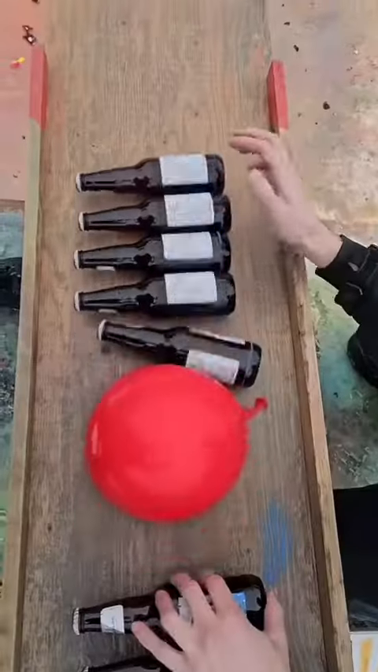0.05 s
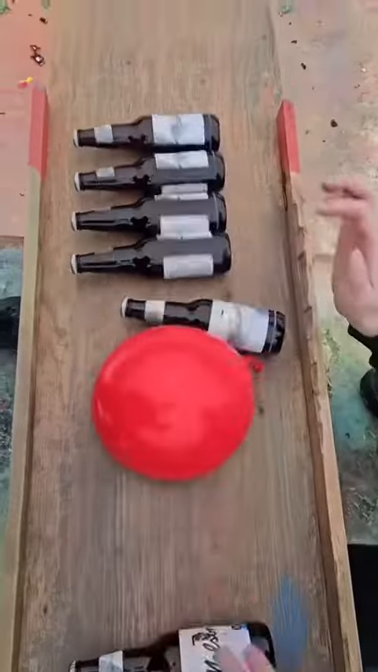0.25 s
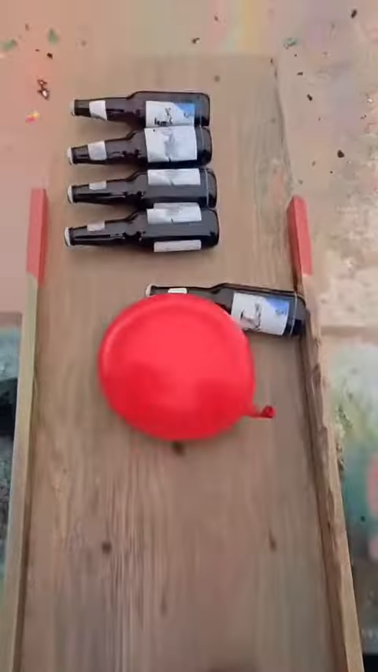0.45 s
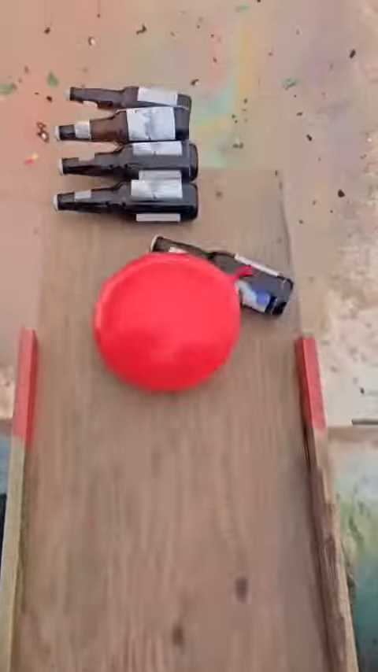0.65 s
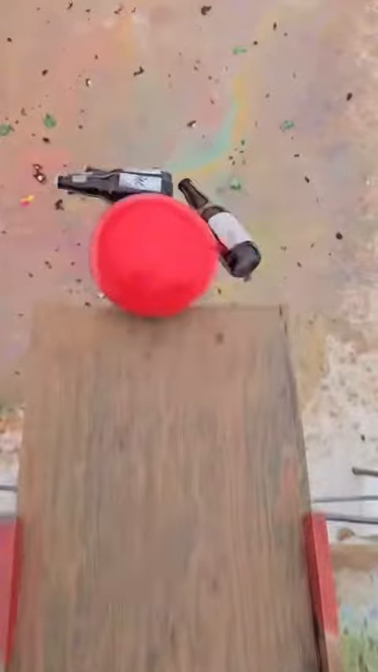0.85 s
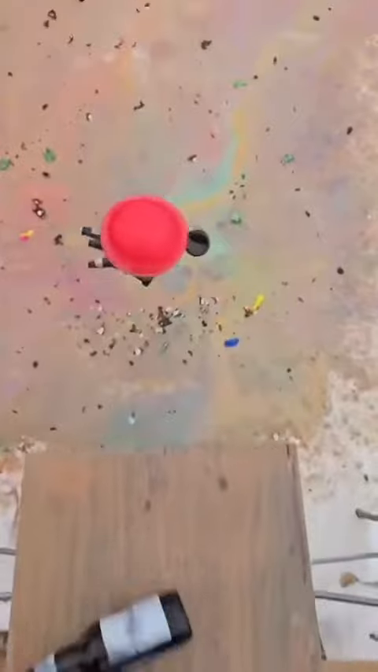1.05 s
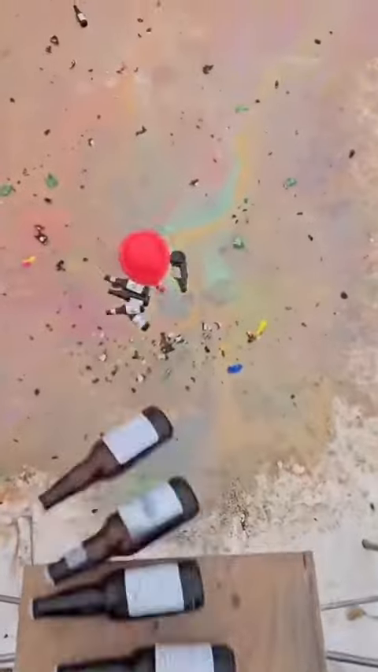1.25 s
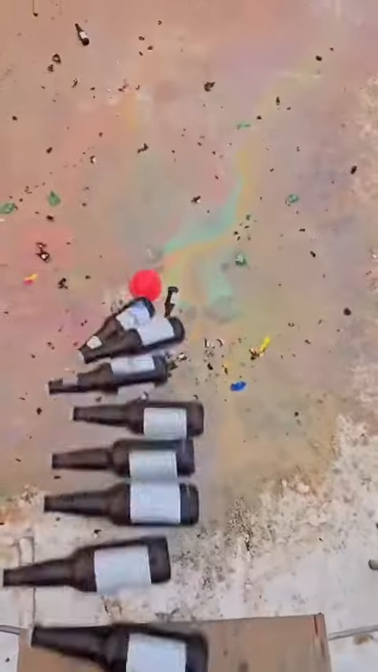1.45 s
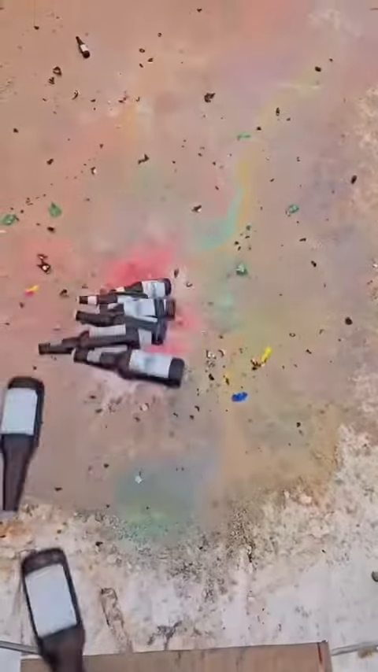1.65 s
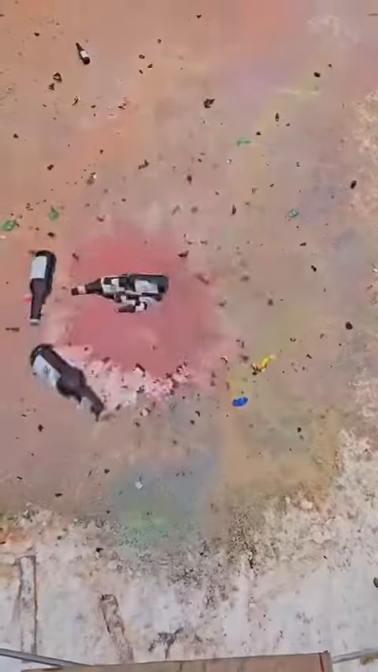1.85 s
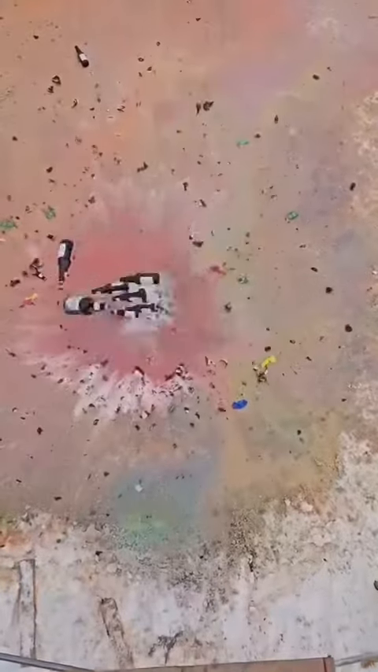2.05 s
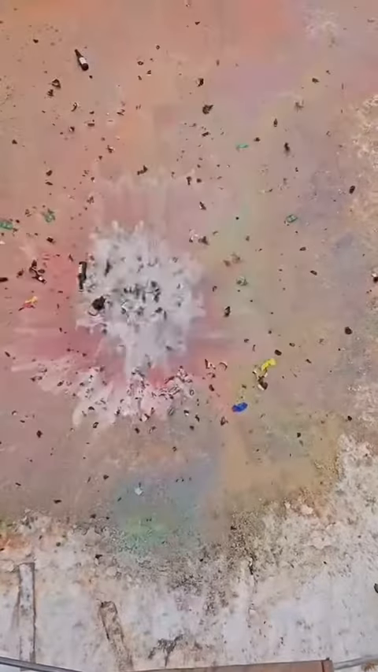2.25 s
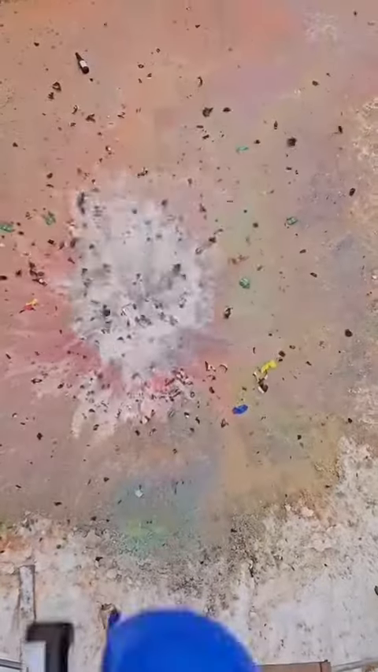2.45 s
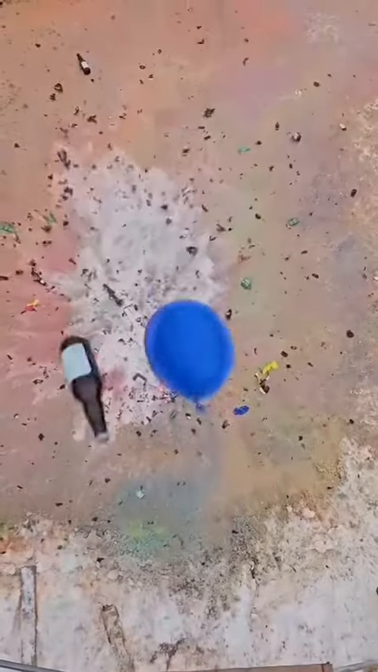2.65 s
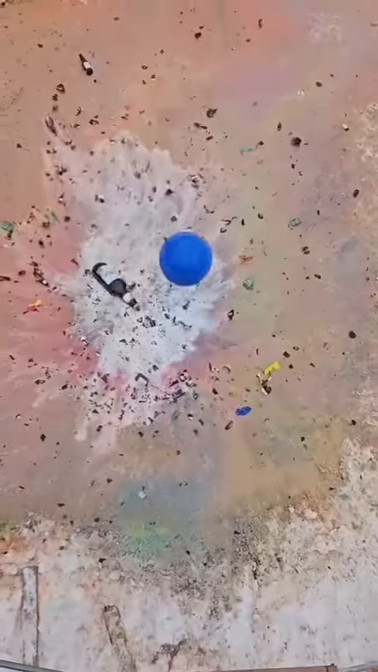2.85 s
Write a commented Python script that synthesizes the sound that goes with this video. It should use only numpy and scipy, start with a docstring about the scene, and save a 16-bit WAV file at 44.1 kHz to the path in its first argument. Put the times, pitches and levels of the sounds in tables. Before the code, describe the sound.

Bottles rolling and knocking on a plywood ramp, followed by rapid popping glass crashes and scattering shards

```python
"""Full glass bottles rumble down a plywood chute beside the microphones: noisy bumps and knocks excite board modes.
On the way glass rattles and bottle clinks bottle: rough contacts ring damped modes of the glass.
Later they burst one after another on hard ground below: each crack is gritty noise with ringing fragments,
each pop and thud a struck, heavily damped resonance, and shards and liquid spray as coloured noise and clicks.
Throughout there is faint open air, shaped noise, and only a short scatter from nearby surfaces."""
import sys
import numpy as np
from scipy import signal
from scipy.fft import rfft, irfft, next_fast_len
from scipy.io import wavfile

SR = 44100
rng = np.random.default_rng(int(sys.argv[2]) if len(sys.argv) > 2 else 0)


def gain_from_db(level_db):
    """Convert decibel levels to linear amplitude factors (20 dB per decade)."""
    decades = np.asarray(level_db, float) / 20
    return 10 ** decades


def persist_wave(psi):
    """Save psi, clipped to +-1, as 16-bit WAV."""
    counts = np.round(np.clip(psi, -1, 1) * 32767).astype(np.int16)
    wavfile.write(sys.argv[1], SR, np.atleast_2d(counts).T)


N = 130095  # samples in the scene
TAIL_N = int(0.4 * SR)  # samples in a decaying tail


def level(x, db=0):
    """Power normalisation: scales x to an rms level in dB."""
    return x * gain_from_db(db) / np.sqrt(np.mean(x ** 2))


def curve(table, column):
    """Amplitude envelope: gain over time from a level column, near silence (-120 dB) before the first row."""
    rows = np.array(table)
    return gain_from_db(np.interp(np.arange(N) / SR, rows[:, 0], rows[:, column], left=-120))


def colour(x, table):
    """Spectral weighting: filters x by (f/Hz, level/dB) points joined on a logarithmic frequency axis."""
    rows = np.array(table)
    size = next_fast_len(len(x) + 4096)
    hz = np.maximum(np.arange(size // 2 + 1) * SR / size, 1)
    gain = gain_from_db(np.interp(np.log(hz), np.log(rows[:, 0]), rows[:, 1]))
    return irfft(rfft(x, size) * gain, size)[:len(x)]


def ring(x, hz, t60):
    """Damped harmonic oscillator: one mode driven by x; a unit click rings with a peak of about 1."""
    r = np.exp(-np.log(1000) / (t60 * SR))
    w = 2 * np.pi * min(hz, 0.45 * SR) / SR
    return signal.lfilter([0, r * np.sin(w)], [1, -2 * r * np.cos(w), r * r], x)


def fade(t60):
    """Exponential decay: starts at 1 and falls 60 dB in t60 seconds."""
    return np.exp(-np.log(1000) * np.arange(TAIL_N) / SR / t60)


def clicks(per_s, spread_db):
    """Random impulse train: clicks of either sign, some stronger than the rest, up to a limit."""
    chance, sign, strength = rng.random((3, N))
    excess = np.minimum(-np.log(1 - strength), 3.0)
    return (chance < per_s / SR) * np.sign(sign - 0.5) * gain_from_db(spread_db * excess)


def add(out, s, x):
    """Superposition: mixes x into out from time s."""
    i = max(int(s * SR), 0)
    out[i:i + len(x)] += x[:len(out) - i]


def scatter(x, t60):
    """Diffuse reflection: x convolved with a short, decaying random tail of unit energy."""
    tail = rng.standard_normal(TAIL_N) * fade(t60)
    return signal.fftconvolve(x, tail / np.linalg.norm(tail))[:N]


# spectrum of the open air, relative: f/Hz, level/dB per Hz
AIR_COLOUR = [(25, 9), (60, -2), (150, 3), (300, -17), (1000, -23.5), (4000, -25), (9000, -37),
              (13000, -61), (14500, -83)]


def open_air():
    """Stationary ambient noise: white noise with a fixed spectral weighting."""
    return level(colour(rng.standard_normal(N), AIR_COLOUR), -46.5)


def wander():
    """Slow random modulation: the drive of one mode drifts as the bottles travel along the board."""
    per_s, depth_db = 12, 2
    steps = rng.standard_normal(int(N / SR * per_s) + 2)
    drift = np.interp(np.arange(N) / SR * per_s, np.arange(len(steps)), steps)
    return gain_from_db(depth_db * drift)


# how hard the chute is driven: t/s, rolling level/dB, glass rattle level/dB, weight of the deepest modes level/dB
DRIVE = [(0.0, -40, -60, -1), (0.21, -22, -47.5, -4), (0.43, -13.5, -36, -6), (0.49, -10, -36.5, -4),
         (0.64, -10, -35.5, -3.5), (0.82, -7.5, -34.5, -1.5), (0.88, -10.5, -44, -4),
         (1.39, -12.5, -42.5, -9), (1.41, -15, -45, 3), (1.5, -15.5, -35, -2), (1.74, -28.5, -35, 9),
         (1.93, -33.5, -57.5, 11), (2.09, -28.5, -51, 7.5), (2.32, -19.5, -51, -8), (2.59, -32.5, -72, 7),
         (2.76, -45, -52, -19), (2.95, -87, -53, -30)]
# modes of the plywood board: f/Hz, relative level/dB, t60/s while rolling
BOARD_MODES = [(74.4, -24.5, 0.07), (105.1, -10, 0.23), (136.7, 0, 0.065), (169.4, -0.5, 0.066),
               (208.8, -1, 0.11), (249.8, -0.5, 0.15), (299.6, -1.5, 0.083), (345.7, -3, 0.07),
               (422.3, -7, 0.099), (484.5, -5.5, 0.086), (565, -6.5, 0.039), (691, -16.5, 0.044),
               (790, -16.5, 0.023), (1166, -30, 0.023), (1350, -24, 0.029)]


def rolling():
    """Modal excitation by roughness: small bumps under the rolling bottles drive each plywood mode."""
    bumps_per_s, spread_db, deep_hz = 1200, 3, 150
    shared = clicks(bumps_per_s / 4, spread_db)
    deep_weight = curve(DRIVE, 3)
    out = np.zeros(N)
    for hz, db, t60 in BOARD_MODES:
        common = 1.8 * rng.choice([-1, 1]) * shared
        own = 0.5 * clicks(bumps_per_s, spread_db)
        mode = gain_from_db(db) * ring((common + own) * wander(), hz, t60)
        out += mode * (deep_weight if hz < deep_hz else 1)
    return level(out) * curve(DRIVE, 1)


# bottles knock the chute: t/s, peak level/dB, brightness as level/dB per octave about 250 Hz
KNOCKS = [(0.026, -21.5, 2), (.058, -17, 10), (.121, -18.5, 5), (0.166, -14.5, 4), (.225, -4.5, 6),
          (.289, -5.5, 4.5), (0.352, -8.5, -5), (0.51, -2.5, 9.5), (0.718, -19, 7), (0.845, 0, -8),
          (0.93, 1.5, 2), (.991, -22, 1), (1.026, -10, -11), (1.188, -13, 3), (1.299, -2, -4),
          (1.337, -10, 2), (1.354, -1.5, -1), (1.396, -4, 3), (2.025, -11.5, 8), (2.199, -3, 3),
          (2.674, -14, -1), (2.685, -14.5, -6.5)]


def knocks():
    """Impact excitation: a brief, smooth contact force rings the board modes in random proportions."""
    contact_s = 0.00087
    out = np.zeros(N)
    t = np.arange(SR // 4) / SR
    force = np.sin(np.pi * np.minimum(t / contact_s, 1)) ** 2
    # a knock rings 1.55 times as long as the rolling modes
    modes = np.array([gain_from_db(db) * ring(force, hz, t60 * 1.55) for hz, db, t60 in BOARD_MODES])
    octaves = np.log2(np.array(BOARD_MODES)[:, 0] / 250)
    for s, db, tilt_db in KNOCKS:
        share = rng.uniform(0.067, 1, len(BOARD_MODES)) * gain_from_db(tilt_db * octaves)
        knock = share @ modes
        add(out, s, gain_from_db(db) * knock / np.abs(knock).max())
    return out


# spectrum of glass rattling on wood, relative: f/Hz, level/dB per Hz
RATTLE_COLOUR = [(530, -14), (900, 3.5), (2440, -4), (2870, -5), (3220, -5), (8160, -15), (9690, -26),
                 (12300, -15), (14000, -51)]
# modes of a full bottle: f/Hz, relative level/dB, t60/s when rung by small contacts while rolling
BOTTLE_MODES = [(1567, 13.5, 0.063), (2156, 1.5, 0.027), (2777, -1, 0.2), (2937, 6, 0.096),
                (3430, 7.5, 0.05), (3795, 4, 0.12), (4260, 2.5, 0.1), (4680, -0.5, 0.077),
                (5340, -1.5, 0.19), (6020, -4.5, 0.17), (11700, -24, 0.07)]


def rattle():
    """Repeated micro-impacts: gritty noise and ringing bottle modes that swell with random jolts."""
    contacts_per_s, jolts_per_s, jolt_t60_s, jolt_depth = 120, 60, 0.12, 0.12
    grit = level(clicks(2000, 0.82)) + 1.6 * rng.standard_normal(N)
    glass = sum(gain_from_db(db) * ring(clicks(contacts_per_s, 0.93), hz, t60) for hz, db, t60 in BOTTLE_MODES)
    jolts = signal.fftconvolve(np.abs(clicks(jolts_per_s, 4.5)), fade(jolt_t60_s))[:N]
    flutter = level(1 + jolt_depth * jolts)
    mix = level(colour(grit, RATTLE_COLOUR)) + level(glass, -4)
    return mix * flutter * curve(DRIVE, 2)


# bottle touches bottle: t/s, tone peak level/dB, f/Hz, time scale of contact, ring and clatter/s,
# clatter peak level/dB relative to the tone
CLINKS = [(0.3227, -33.5, 2860, 0.28, 1.5), (0.4, -29, 2720, 0.12, 1.5),
          (0.5323, -16.5, 2815, 0.095, -11.5), (0.5875, -22, 2740, 0.039, -8),
          (0.7347, -32, 2170, 0.084, -2.5), (0.8091, -27, 1130, 0.11, -5),
          (1.1484, -26.5, 2016, 0.084, 1.5), (1.1775, -28.5, 1650, 0.071, -4),
          (1.3839, -35, 3120, 0.096, 4), (1.4818, -23, 3650, 0.15, -24), (1.483, -22, 1680, 0.03, -2),
          (1.9689, -30.5, 2530, 0.12, 2), (2.161, -13, 3730, 0.038, -15), (2.162, -19.5, 1870, 0.041, -17),
          (2.2837, -4, 4260, 0.031, -23), (2.3114, -10.5, 4570, 0.031, -6),
          (2.3137, -8.5, 2640, 0.024, -1.5), (2.408, -16, 3910, 0.032, -20)]


def clinks():
    """Coupled glass modes: a rough contact rings two close tones, with a clatter that rings the whole bottle."""
    out = np.zeros(N)
    for s, db, hz, scale_s, clatter_db in CLINKS:
        noise = rng.standard_normal((2, TAIL_N))
        push = noise[0] * fade(scale_s * 0.16)
        tone = ring(push, hz, scale_s * 0.8)
        tone += gain_from_db(-9.5) * ring(push, hz * 1.06, scale_s * 2.4)
        rough = noise[1] * fade(scale_s * 1.94)
        body = 0
        for share, (m_hz, m_db, m_t60) in zip(rng.random(len(BOTTLE_MODES)) ** 2, BOTTLE_MODES):
            body = body + share * gain_from_db(m_db) * ring(rough, m_hz, m_t60 / 2)
        # the crash spectrum without its low rows
        clatter = level(colour(rough, [(600, -37)] + CRASH_COLOUR[3:])) + level(body, -1.8)
        tone = tone / np.abs(tone).max()
        clatter = clatter / np.abs(clatter).max()
        add(out, s, gain_from_db(db) * (tone + gain_from_db(clatter_db) * clatter))
    return out


# spectrum of debris, relative; its upper rows also colour the clatter of clinks: f/Hz, level/dB per Hz
CRASH_COLOUR = [(290, -3), (500, -2), (644, -2.5), (842, -11.5), (997, -8), (1780, -14.5), (4260, -12),
                (6780, -13.5), (7580, -13), (12600, -16), (14500, -39)]


def debris():
    """Granular sound: a gritty splash mixed with many small shards, each size with its own pitch."""
    sizes, shards_per_s, spread_db = 60, 1000, 4
    shards = 0
    for hz in 1800 * 5 ** rng.random(sizes):
        t60 = 0.028 * (3000 / hz) ** 0.5  # higher shards ring shorter
        shards = shards + ring(clicks(shards_per_s / sizes, spread_db), hz, t60)
    splash = level(clicks(2500, 3.3)) + 1.6 * rng.standard_normal(N)
    return level(colour(level(splash) + level(shards, -2.5), CRASH_COLOUR))


# shards and liquid spraying and falling, during the bursts and between them: t/s, level/dB
SHOWER = [(1.46, -42), (1.512, -47), (1.546, -28), (1.558, -31.5), (1.596, -35), (1.604, -27), (1.638, -34),
          (1.65, -23), (1.716, -38), (1.756, -29.5), (1.795, -28), (1.803, -37.5), (1.93, -43.5),
          (1.97, -34.5), (2.11, -42), (2.128, -36.5), (2.152, -36.5), (2.164, -26), (2.31, -22),
          (2.388, -30.5), (2.392, -23), (2.456, -33), (2.472, -20.5), (2.496, -35), (2.568, -41),
          (2.58, -26), (2.596, -37), (2.742, -44), (2.95, -47)]


def spray():
    """Envelope modulation of debris: a shower, plus a rise and exponential decay after each crack."""
    rise_s, t60_s, below_crack_db = 0.041, 0.11, -30
    envelope = curve(SHOWER, 1)
    for s, db, _ in CRACKS:
        add(envelope, s, gain_from_db(db + below_crack_db) * fade(t60_s) * (1 - fade(rise_s)))
    return envelope * debris()


# spectrum of the crack itself, relative: f/Hz, level/dB per Hz
CRACK_COLOUR = [(400, -10), (900, 0.5), (2000, -20), (3800, -4.5), (6500, -13.5), (12500, -23),
                (14500, -43)]


def splinters(t60):
    """Fracture noise: gritty decaying noise also rings five fresh fragments; the sum has peak 1."""
    tail = fade(t60)
    grit = rng.standard_normal(TAIL_N) * gain_from_db(2.34 * rng.standard_normal(TAIL_N)) * tail
    pieces = sum(ring(grit, hz, 0.012) for hz in 1800 * 4 ** rng.random(5))
    x = level(colour(grit, CRACK_COLOUR)) + level(pieces, -7)
    return x / np.abs(x).max()


# bottles crack on the ground: t/s, peak level/dB, t60/s of the gritty noise
CRACKS = [(1.5096, -8, 0.038), (1.5556, -8.5, 0.036), (1.6053, -8.5, 0.047), (1.651, -33, 0.026),
          (1.723, -34, 0.026), (1.734, -4, 0.027), (1.7585, -12, 0.059), (2.1224, -19, 0.013),
          (2.1296, -8, 0.0078), (2.162, -12.5, 0.072), (2.2154, -34, 0.05), (2.2505, -9.5, 0.077),
          (2.358, -8.5, 0.031), (2.3933, -7, 0.033), (2.4722, -9, 0.014), (2.5759, -16.5, 0.024),
          (2.8054, -32, 0.037)]


def cracks():
    """Brittle fracture: each crack is a separate burst of splinter noise."""
    out = np.zeros(N)
    for s, db, t60 in CRACKS:
        add(out, s, gain_from_db(db) * splinters(t60))
    return out


# pressure of the bottles is let go: t/s, pop level/dB before its high-pass, thud level/dB relative to that
POPS = [(1.5109, -7, 2), (1.5587, -3, -2.5), (1.6066, 1.5, -6), (1.6528, 0.5, -27), (1.7344, -5, -4),
        (2.1212, -10, -3), (2.1299, 1.5, -5.5), (2.2169, 5, -15), (2.2558, 1.5, -2), (2.311, -2.5, -3.5),
        (2.395, -3, 2.5), (2.4747, -13.5, 6), (2.5770, 0.5, -23), (2.8073, -8, -43)]


def pops():
    """Pressure release: an impulse rings a very short pop with a snap, then a lower, longer thud."""
    pop_hz, thud_lag_s = 844, 0.00091
    out = np.zeros(N)
    click = np.eye(1, TAIL_N)[0]
    pop = ring(click, pop_hz, 0.0027)
    pop += gain_from_db(-11) * ring(click, 3630, 0.00067)  # the snap
    pop = signal.sosfilt(signal.butter(2, pop_hz * 0.52, "high", fs=SR, output="sos"), pop)
    thud = ring(click, 272, 0.02)
    for s, db, thud_db in POPS:
        add(out, s, -gain_from_db(db) * pop)
        add(out, s + thud_lag_s, -gain_from_db(db + thud_db) * thud)
    return out


def sources():
    """Superposition of all sources on one path; only the bursts below gain a scattered echo."""
    far = spray() + cracks() + pops()
    near = open_air() + rolling() + knocks() + rattle() + clinks()
    return near + far + gain_from_db(-6.5) * scatter(far, 0.27)


# gain of the scatter that differs between the two microphones: f/Hz, level/dB against the common sound
WIDTH = [(60, -14), (110, -25.5), (200, -15.5), (370, -9), (690, -1.5), (1260, -3), (2330, -9.5),
         (4280, -2.5), (7870, -4.5), (14500, -6)]


def scene():
    """Mid-side stereo: a common path, and a scattered path, drawn anew, of opposite sign at the two microphones."""
    mid = sources()
    side = colour(scatter(sources(), 0.072), WIDTH)
    return np.array([mid + side, mid - side])


def band_limit(x):
    """A steep low-pass at the top of the band."""
    return signal.sosfilt(signal.butter(12, 15080, fs=SR, output="sos"), x)


def record(dry):
    """Band limitation and saturation: deep bass and the very top are cut, the loudest peaks rounded."""
    low_hz, top_hz, ceiling = 90.3, 14600, 1.4
    x = signal.sosfilt(signal.butter(2, low_hz, "high", fs=SR, output="sos"), dry)
    x = ceiling * np.tanh(x / ceiling)
    x = signal.sosfilt(signal.cheby1(10, 0.5, top_hz, fs=SR, output="sos"), x)
    return band_limit(x)


dry = scene()
out = record(dry)
persist_wave(out)
```